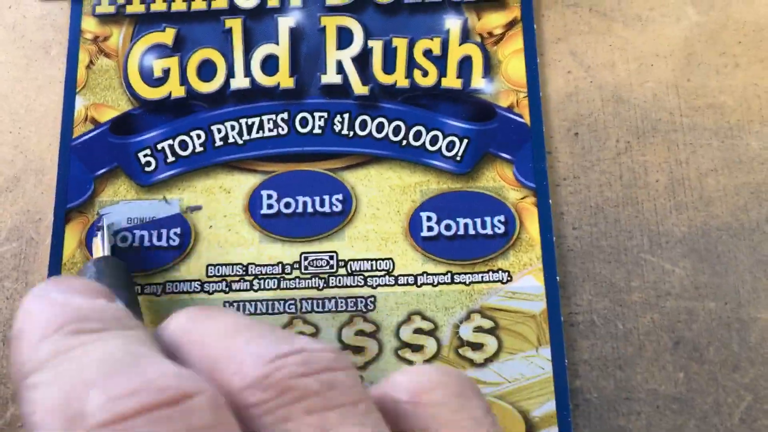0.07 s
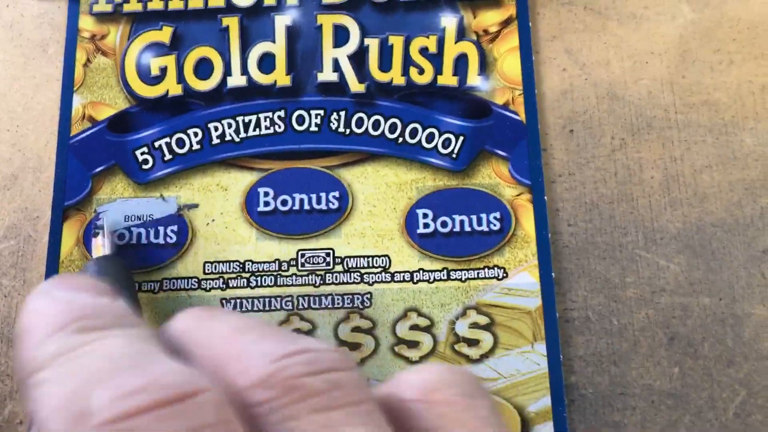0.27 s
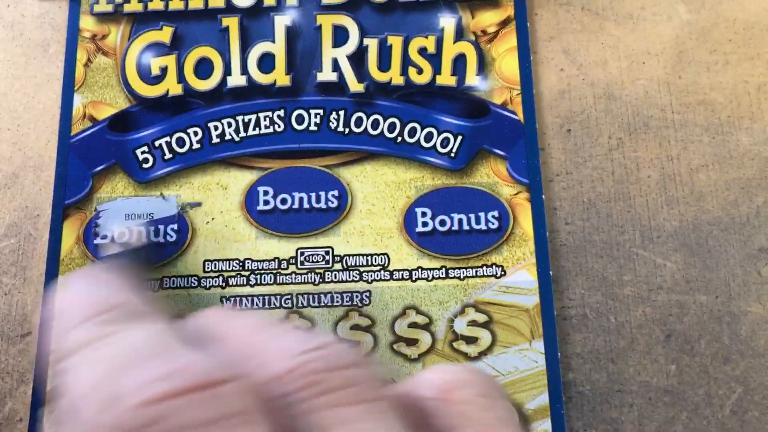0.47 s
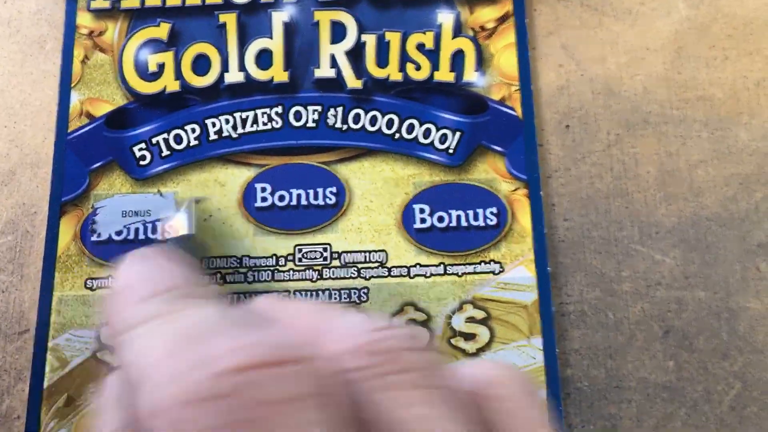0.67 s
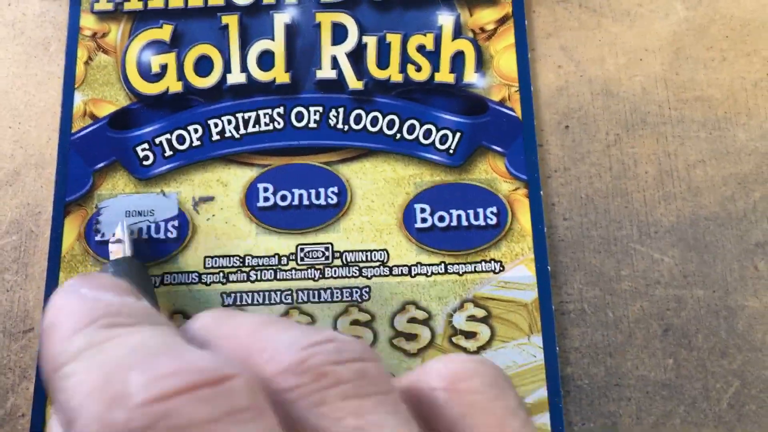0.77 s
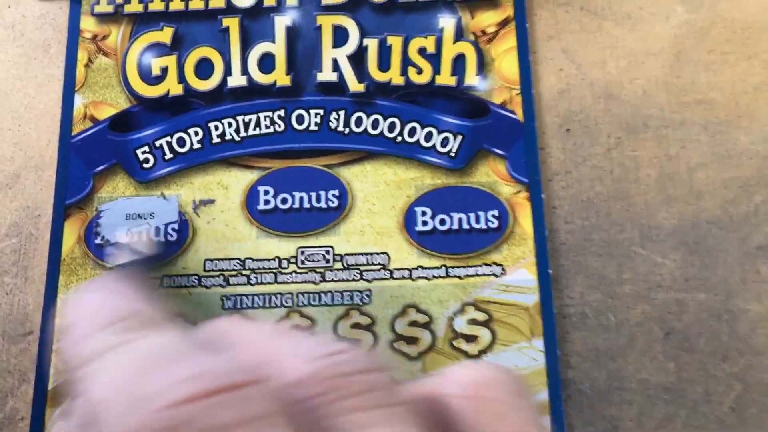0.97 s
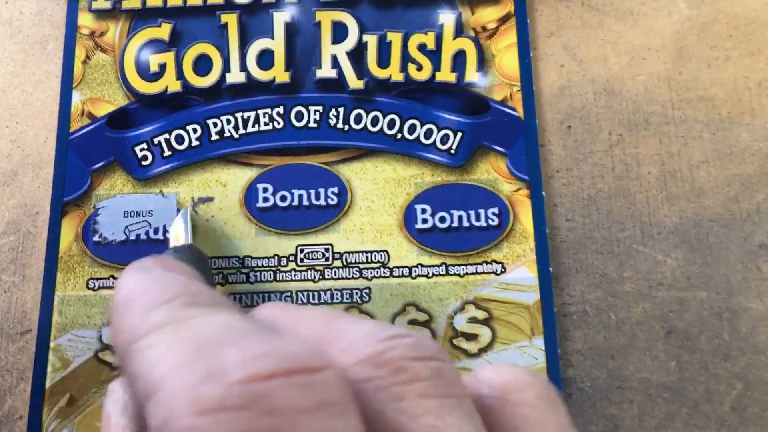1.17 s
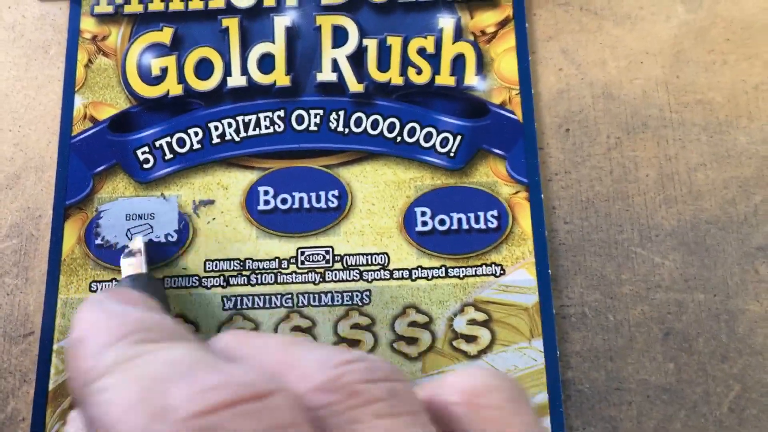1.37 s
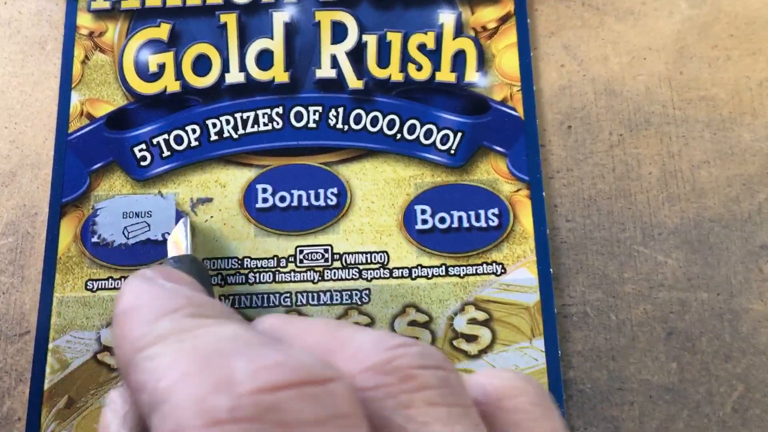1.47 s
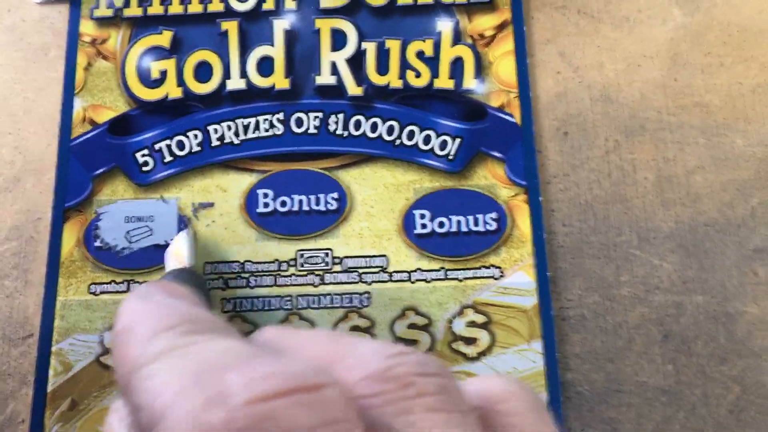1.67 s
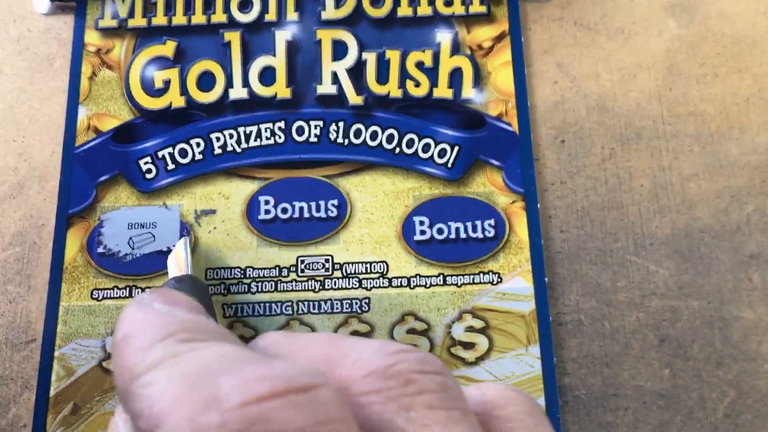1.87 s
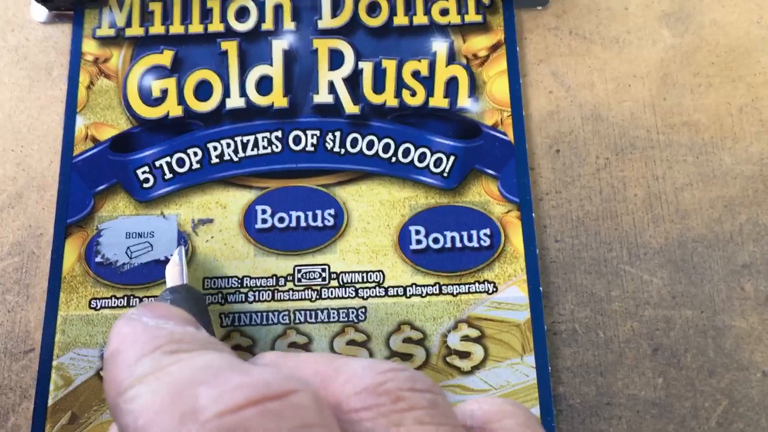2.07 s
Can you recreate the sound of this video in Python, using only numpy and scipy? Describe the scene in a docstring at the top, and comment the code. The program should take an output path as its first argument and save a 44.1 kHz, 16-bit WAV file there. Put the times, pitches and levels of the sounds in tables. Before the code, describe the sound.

A metal tip scratches coating off a card in quick back-and-forth strokes, hissy cuts alternating with duller rubs ending in bright rasps; soft table knocks and low rumble beneath, small quiet room, close single microphone.

```python
"""A small metal tip scrapes a scratch card on a table in a small room, close to one microphone, about six times a second.
Cutting strokes bite at once and darken as they slow; return strokes rub first, then catch with a bright rasp.
Both are showers of random grains, coloured by the resonances of card and tool and by reflections close by.
Beneath lie filtered noise for the rumbling, knocking table, a wavering low hum and faint room air."""
import sys
import numpy as np
from scipy import signal
from scipy.fft import rfft, irfft
from scipy.io import wavfile
from scipy.ndimage import uniform_filter1d

SR = 44100
rng = np.random.default_rng(int(sys.argv[2]) if len(sys.argv) > 2 else 0)


def wav_out(sig):
    """Save sig, one row per channel (or a flat mono array), as 16-bit PCM at SR to the path in sys.argv[1]."""
    wavfile.write(sys.argv[1], SR, np.round(np.clip(np.atleast_2d(sig).T, -1, 1) * 32767).astype(np.int16))


N = 94021
T = np.arange(N) / SR  # seconds

# Scrape levels in these tables are relative: a trim for each layer follows.
# return strokes: start_s, catch_s, release_s, rub_level_db, catch_level_db
RETURN_STROKES = [(-.02, .000, .019, -41, -31.5), (.178, .191, .227, -42, -35),
                  (.360, .385, .413, -43, -33), (.542, .568, .588, -42, -39.5),
                  (.715, .742, .752, -40.5, -29.5), (.878, .909, .926, -41.5, -35.5),
                  (1.040, 1.064, 1.086, -41, -37), (1.198, 1.217, 1.239, -40.5, -41),
                  (1.351, 1.377, 1.391, -40.5, -34), (1.505, 1.519, 1.542, -43.5, -36),
                  (1.649, 1.679, 1.686, -41, -34)]
# light grazes of the tip outside the main strokes: start_s, stop_s, level_db
GRAZES = [(0.445, 0.486, -49), (0.965, 0.975, -44), (1.945, 2.08, -65.5)]
# instant snags of the tip on a ridge of coating: start_s, level_db
SNAGS = [(0.012, -34.5), (0.143, -52), (.566, -33.5), (0.748, -34), (0.96, -50), (1.214, -34),
         (1.234, -35.5), (1.356, -62), (1.384, -39)]
# cutting strokes: start_s, brake_s, stop_s, hiss_level_db, hiss_sag_db_per_s, rasp_level_db
CUTTING_STROKES = [(.079, .127, .147, -32.5, -45, -30.5), (.274, .315, .333, -38, -60, -33),
                   (.475, .497, .512, -33.5, 20, -35.5), (.634, .668, .683, -32.5, 10, -35),
                   (.804, .840, .850, -32.5, 30, -32), (.982, 1.003, 1.017, -32, 50, -34),
                   (1.114, 1.157, 1.170, -36, 10, -37), (1.270, 1.300, 1.321, -32, 110, -37.5),
                   (1.424, 1.458, 1.471, -32.5, 140, -36), (1.576, 1.610, 1.623, -34, 10, -37)]
# soft knocks as the hand turns round or settles: start_s, level_db
KNOCKS = [(0.263, -42.5), (0.603, -49), (0.754, -40), (0.784, -48), (0.955, -41), (1.264, -44),
          (1.367, -37.5), (1.685, -35.5), (1.722, -48), (1.75, -47)]
# level of the table shaking under the hand: time_s, level_db
RUMBLE_LEVEL = [(0, -44), (.3, -42), (.6, -40), (1.1, -35.5), (1.3, -40.5), (1.55, -41.5), (1.8, -45),
                (2.13, -45)]

# resonances (positive gain) and hollows (negative) of card and tool: pitch_hz, width_hz, gain_db
CARD_AND_TOOL = [(592, 90, 6.5), (820, 130, -6.5), (1108, 85, 7.5), (1402, 115, 11), (1750, 70, 7.5),
                 (2374, 75, 11), (2640, 90, 4.5), (3092, 90, 4.5), (3290, 130, -7), (3505, 160, 8.5),
                 (4105, 130, 6), (4392, 130, 4.5), (4930, 200, -5), (6165, 290, 7.5)]
# ringing of the tip when pushed backwards: pitch_hz, width_hz, gain_db
TIP_RING = [(6720, 300, 9), (8300, 900, 7)]
# resonances of the table: pitch_hz, width_hz, gain_db
TABLE_MODES = [(63, 16, 6), (88, 20, 5)]

# Broad noise spectra, relative within each layer.
# dull rub of the backward slide: pitch_hz, density_db
RUB_SPECTRUM = [(100, -7), (300, 3), (600, 2), (1000, 1), (1600, -3), (2400, -16.5), (4000, -10.5),
                (7000, -17), (15000, -28)]
# bright catch of the backward tip: pitch_hz, density_db
CATCH_SPECTRUM = [(300, -16.5), (1000, -14), (2000, -1.5), (2700, -2.5), (4000, 0.5), (5200, -2.5),
                  (6500, 1.5), (8500, -7), (9300, -7.5), (11300, -8.5), (13000, -3.5), (15500, -10.5)]
# fine hiss of the cutting edge: pitch_hz, density_db
HISS_SPECTRUM = [(300, -16.5), (1000, -0.5), (2000, -6.5), (3500, 0.5), (5300, -0.5), (6800, -0.5),
                 (7600, -6), (10000, -1.5), (11500, -8.5), (13000, -5), (15500, -12)]
# coarser rasp of the card under the cut: pitch_hz, density_db
RASP_SPECTRUM = [(100, -14), (250, -4), (500, -1), (1000, 0.5), (1600, 5.5), (2400, 1), (4000, -12),
                 (7000, -57), (15000, -76)]
# knocks on the table: pitch_hz, density_db
KNOCK_SPECTRUM = [(50, 7), (140, -0.5), (350, 1.5), (700, -10), (1500, -15), (6000, -32)]
# rumble of the table: pitch_hz, density_db
RUMBLE_SPECTRUM = [(15, -10.5), (30, -19.5), (50, -2), (68, 0.5), (92, -2), (115, -9), (180, -17.5),
                   (400, -19), (1000, -59)]
# air of the quiet room: pitch_hz, density_db
AIR_SPECTRUM = [(100, -3.5), (300, -6), (700, -13), (1400, -15.5), (2500, -21.5), (4500, -30), (6500, -30),
                (10000, -34), (15500, -36)]
# time for the room tail to fall 60 dB: pitch_hz, decay_s
ROOM_DECAY = [(200, 0.75), (1500, .2), (5000, 0.2), (15000, 0.067)]

# return strokes and snags
RETURN_RISE_S, RUB_STOP_DB_PER_S = .006, 950
CATCH_RISE_DB_PER_S, CATCH_STOP_DB_PER_S = 1100, 1600
SNAG_RISE_S, SNAG_FALL_DB_PER_S = .002, 1700
# cutting strokes
CUT_RISE_S, CUT_STOP_DB_PER_S = .005, 1400
BRAKE_DB_PER_S = 800  # extra fall of the hiss while braking
RASP_SWELL_DB = 10
# layer trims
RUB_TRIM_DB, CATCH_TRIM_DB, HISS_TRIM_DB, RASP_TRIM_DB = -0.5, 0.5, 2.5, -3.5
# grains, judder of the tip and drifting colour
FINE_GRAINS_PER_S, COARSE_GRAINS_PER_S, GRAIN_SPREAD_DB = 20000, 7000, 1.5
JUDDER_HZ, JUDDER_DB = 317, 1.6
DRIFT_DB, DRIFT_WIDTH_HZ, DRIFT_S = 1.5, 900, .02
# table, background, room and recorder
KNOCK_RISE_S, KNOCK_FALL_DB_PER_S = .004, 900
HUM_HZ, HUM_DB, AIR_DB = 63.3, -50, -58.5
NEAR_DB, NEAR_T60_S, TAIL_DB = -9, .022, -30
RECORDER_EDGE_HZ = 15900
FRAME, HOP = 256, 128  # samples in a short-time spectrum


def amp(db):
    """Decibels to gain."""
    return 10 ** (np.asarray(db) / 20)


def unit(x):
    """Scales to rms 1."""
    return x / np.sqrt(np.mean(x ** 2) + 1e-20)


def read(points, hz):
    """Reads a table along a log-frequency axis."""
    pitch_hz, value = np.transpose(points)
    return np.interp(np.log(hz + 1), np.log(pitch_hz), value)


def colour(x, spectrum, peaks=(), size=8192):
    """Minimum-phase filter of unit energy: a broad spectrum plus resonances."""
    hz = abs(np.fft.fftfreq(size, 1 / SR))
    db = read(spectrum, hz)
    for pitch_hz, width_hz, gain_db in peaks:
        db = db + gain_db / (1 + (2 * (hz - pitch_hz) / width_hz) ** 2)
    # the Hilbert transform of the log gain supplies the causal phase
    response = np.exp(signal.hilbert(np.log(amp(db))).conj())
    taps = np.fft.ifft(response).real[:size // 2]
    return signal.fftconvolve(x, taps / np.linalg.norm(taps))[:N]


def wander(rate_hz):
    """Smooth random motion of rms 1, rolling off around the given rate."""
    hz = np.fft.rfftfreq(N, 1 / SR)
    spectrum = rfft(rng.standard_normal(N)) / (1 + (hz / rate_hz) ** 4)
    return unit(irfft(spectrum, N))


def crumble(per_s):
    """Tiny fractures of the coating: random clicks of uneven size, swayed in level by the judder of the tip."""
    signs = rng.choice([-1., 1.], N)
    spread = amp(GRAIN_SPREAD_DB * np.minimum(rng.exponential(1, N), 4))
    sizes = signs * spread * (.5 + rng.random(N))
    happens = rng.random(N) < per_s / SR
    judder = amp(JUDDER_DB * np.clip(wander(JUDDER_HZ), -2, 2))
    return unit(sizes * happens * judder)


def drift(x):
    """Broad patches of colour come and go as the contact point moves over the card."""
    z = signal.stft(x, SR, nperseg=FRAME)[2]
    bands = max(1, round(DRIFT_WIDTH_HZ * FRAME / SR))
    frames = max(1, round(DRIFT_S * SR / HOP))
    field = uniform_filter1d(rng.standard_normal(z.shape), bands, axis=0)
    field = unit(uniform_filter1d(field, frames, axis=1))
    return unit(signal.istft(z * amp(DRIFT_DB * field), SR, nperseg=FRAME)[1][:N])


def press(start, stop, rise_s, fall_db_per_s):
    """Contact of the tip or hand: straight rise, hold, and a steady fall in dB."""
    rise = np.clip((T - start) / rise_s, 0, 1)
    return rise * amp(-fall_db_per_s * np.maximum(T - stop, 0))


def return_strokes():
    """The tip slides back with a dull rub of coarse grains, then catches and rings; now and then it snags."""
    rub, catch = np.zeros(N), np.zeros(N)
    for start, bite, release, rub_db, catch_db in RETURN_STROKES:
        rub += amp(rub_db) * press(start, release, RETURN_RISE_S, RUB_STOP_DB_PER_S)
        approach = amp(catch_db - CATCH_RISE_DB_PER_S * np.maximum(bite - T, 0))
        catch += approach * press(start, release, RETURN_RISE_S, CATCH_STOP_DB_PER_S)
    for start, stop, db in GRAZES:
        rub += amp(db) * press(start, stop, RETURN_RISE_S, RUB_STOP_DB_PER_S)
    for start, db in SNAGS:
        snag = amp(db) * press(start, start + SNAG_RISE_S, SNAG_RISE_S, SNAG_FALL_DB_PER_S)
        catch = np.hypot(catch, snag)  # adds power
    dull = colour(rub * crumble(COARSE_GRAINS_PER_S), RUB_SPECTRUM, CARD_AND_TOOL)
    bright = colour(catch * drift(crumble(FINE_GRAINS_PER_S)), CATCH_SPECTRUM, CARD_AND_TOOL + TIP_RING)
    return amp(RUB_TRIM_DB) * dull + amp(CATCH_TRIM_DB) * bright


def table():
    """The hand shakes the table, a resonant low rumble, and knocks on it in short bursts of noise."""
    rumble = unit(colour(rng.standard_normal(N), RUMBLE_SPECTRUM, TABLE_MODES))
    rumble = rumble * amp(np.interp(T, *np.transpose(RUMBLE_LEVEL)))
    knocks = np.zeros(N)
    for start, db in KNOCKS:
        knocks += amp(db) * press(start, start + KNOCK_RISE_S, KNOCK_RISE_S, KNOCK_FALL_DB_PER_S)
    return rumble + colour(knocks * rng.standard_normal(N), KNOCK_SPECTRUM)


def background():
    """A low sine hum, wavering in pitch and level, over the filtered noise of room air."""
    pitch_hz = HUM_HZ + 0.6 * wander(rate_hz=4)
    waver = amp(0.53 * wander(rate_hz=2.3))
    hum = np.sin(2 * np.pi * np.cumsum(pitch_hz) / SR) * waver
    air = colour(rng.standard_normal(N), AIR_SPECTRUM)
    return amp(HUM_DB) * unit(hum) + amp(AIR_DB) * unit(air)


def cutting_strokes():
    """The edge bites with a hiss of fine grains; as it slows, coarser grains shake the card."""
    hiss, rasp = np.zeros(N), np.zeros(N)
    for start, brake, stop, hiss_db, sag, rasp_db in CUTTING_STROKES:
        since = np.clip(T - start, 0, stop - start)
        braking = np.clip(T - brake, 0, stop - brake)
        contact = press(start, stop, CUT_RISE_S, CUT_STOP_DB_PER_S)
        hiss += contact * amp(hiss_db - sag * since - BRAKE_DB_PER_S * braking)
        rasp += contact * amp(rasp_db - RASP_SWELL_DB * (1 - since / (stop - start)) ** 2)
    fine = colour(hiss * drift(crumble(FINE_GRAINS_PER_S)), HISS_SPECTRUM, CARD_AND_TOOL)
    coarse = colour(rasp * crumble(COARSE_GRAINS_PER_S), RASP_SPECTRUM, CARD_AND_TOOL)
    return amp(HISS_TRIM_DB) * fine + amp(RASP_TRIM_DB) * coarse


def room(x, size=16384):
    """Quick reflections off table and hand, then a fainter room tail whose treble dies first."""
    t = T[:size]
    near = rng.standard_normal(size) * (t > .001) * amp(-60 * t / NEAR_T60_S)
    late_noise = rng.standard_normal(size) * (t > .006)
    hz, when, z = signal.stft(late_noise, SR, nperseg=FRAME)
    decay = amp(-60 * when / read(ROOM_DECAY, hz)[:, None])
    tail = signal.istft(z * decay, SR, nperseg=FRAME)[1][:size]
    echoes = amp(NEAR_DB) * near / np.linalg.norm(near)
    echoes = echoes + amp(TAIL_DB) * tail / np.linalg.norm(tail)
    return x + signal.fftconvolve(x, echoes)[:N]


def scene():
    """Scraping in the room, with table and background, at one close microphone."""
    scraping = cutting_strokes() + return_strokes()
    return (room(scraping) + table() + background())[None]


def record(dry):
    """The recorder's band limit: a steep linear-phase low-pass."""
    taps = signal.firwin(401, RECORDER_EDGE_HZ, window=("kaiser", 8), fs=SR)
    return signal.oaconvolve(dry, taps[None], "same")


dry = scene()
out = record(dry)
wav_out(out)
```